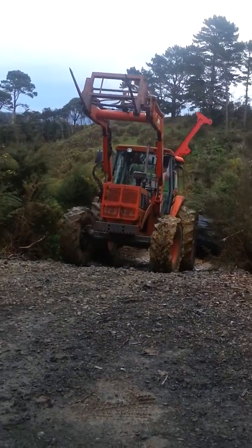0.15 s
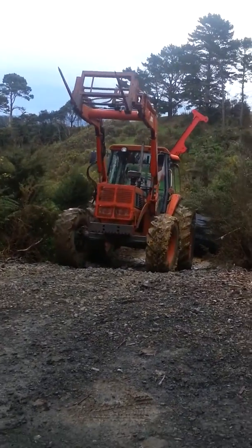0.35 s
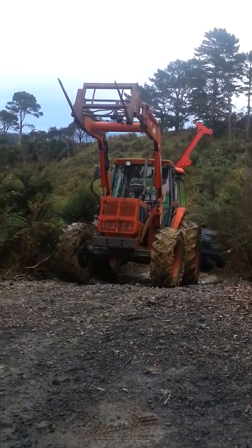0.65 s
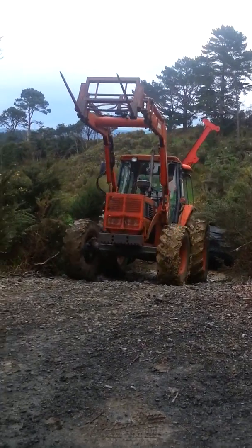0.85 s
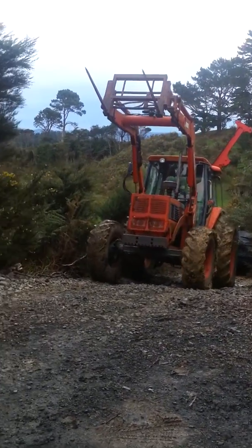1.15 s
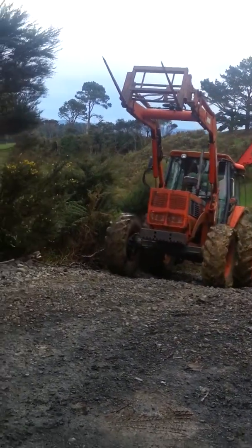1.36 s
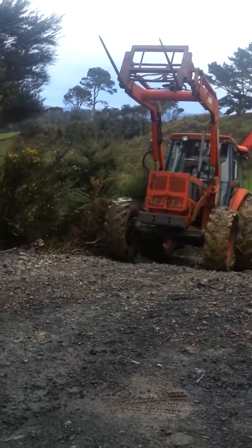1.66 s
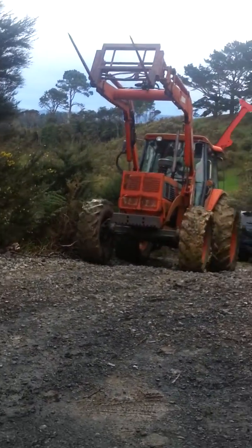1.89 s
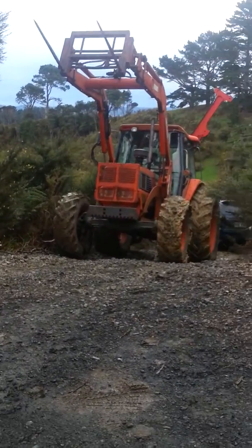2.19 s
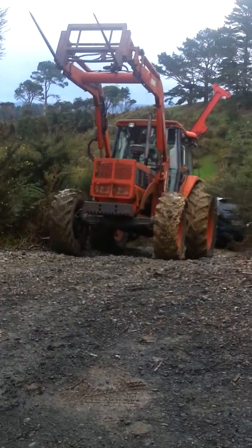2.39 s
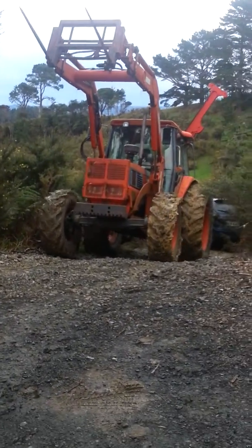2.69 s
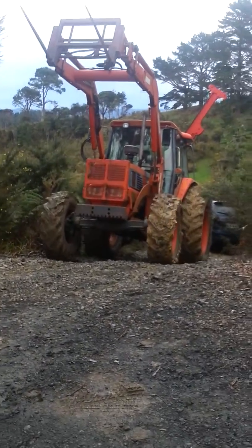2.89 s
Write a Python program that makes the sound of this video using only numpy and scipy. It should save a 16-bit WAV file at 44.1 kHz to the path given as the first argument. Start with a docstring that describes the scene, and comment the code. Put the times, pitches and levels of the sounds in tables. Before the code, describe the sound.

A diesel tractor engine runs continuously from 0 to 3 seconds, a throaty, hollow, low-mid throb of about fifty firings a second with a slightly lumpy repeating beat. Rough block, fan and valve clatter fills in above. Speed rises slightly around 0.3 and again at the end; loudness flutters, dipping near 1.8. A tiny sharp stone tick falls at 0.24. Open outdoor stereo, dry.

```python
"""The throbbing roar and clatter of a five-cylinder diesel tractor on a gravel track, heard in the open.
Each firing excites the exhaust pipe's resonances with a pulse; hum is a sum of sines locked to the crank.
Block, fan and injectors give band noise and ringing, modulated by the firings; moving air makes the level waver.
A stone ticks under a tyre early on. A spaced pair of ports hears the noise, later on the left in some bands."""
import sys
import numpy as np
from scipy import signal
from scipy.io import wavfile

SR = 44100
rng = np.random.default_rng(int(sys.argv[2]) if len(sys.argv) > 2 else 0)


def to_wav(s):
    """Save 16-bit WAV."""
    ch = np.atleast_2d(s).T  # columns
    pcm = np.round(np.clip(ch, -1, 1) * 32767)  # PCM
    wavfile.write(sys.argv[1], SR, pcm.astype(np.int16))


def invert_db(level):
    """Linear amplitude ratio for a level in decibels (20 dB per decade), elementwise."""
    return 10 ** (np.asarray(level, dtype=float) / 20)


N = 134064
RUN_IN = SR // 2  # samples computed before time zero, so that resonances are already ringing
LENGTH = N + RUN_IN

# Crank speed: [t/s, speed/rpm]
CRANK_SPEED = [(0.0, 1212.6), (0.25, 1262.4), (0.51, 1256.2), (0.76, 1222.4), (1.01, 1203.7),
               (1.27, 1201.0), (1.52, 1208.2), (1.77, 1213.1), (2.03, 1208.9), (2.28, 1228.3),
               (2.53, 1214.6), (2.79, 1211.5), (3.04, 1264.1)]
IDLE_RPM = 1213
START_CYCLE = -.011  # share of the two-turn cycle at time zero

# Pipe resonances: [f/Hz at idle, t60/s at idle, delay/ms, 1 if the pitch follows crank speed]
PIPE_RESONANCES = [(208, .18, 5.6, 1), (273, .3, .18, 0), (300, .09, 1.06, 0), (435, .13, 2.6, 0),
                   (551, .14, 1.9, 0)]
# Cylinders in firing order, one row each: [relative level/dB given to each pipe resonance in turn]
CYLINDER_STRENGTHS = [(-64, -75, -75, -28, -22.5), (-20, -20, -16.5, -18, -20.5),
                      (-23, -37, -14.5, -61, -32.5), (-16, -59, -20.5, -43, -31),
                      (-11, -25.5, -24.5, -34, -28)]
# Delay from each cylinder, in firing order: [delay/ms]
MANIFOLD_DELAYS = [18.3, 17.03, 17.06, 18.98, 18.44]
FIRING_SPREAD_DB, FIRING_JITTER_MS, PULSE_MS = 1.5, .04, 1.2
PIPE_RISE_CYCLES = 3.4  # full width of a resonance's onset, in cycles of its own pitch
LOW_CUT_HZ = 172.6

# Low orders as pure hum: [multiple of the cycle rate, rms level/dB, lateness/share of the cycle]
HUM_ORDERS = [(5, -57, .156), (10, -45.5, .073), (15, -29.5, .045), (16, -37, .054)]

# Level curves at the listener, before the offsets below: [t/s, exhaust level/dB, roar level/dB]
LEVEL_CURVES = [(0, -17.5, -25.5), (.1, -16.5, -26), (.39, -15, -24.5), (.54, -18, -27.5),
                (.68, -17.5, -26), (.8, -18, -26.5), (.93, -14.5, -24.5), (1.1, -20.5, -28.5),
                (1.23, -16.5, -25), (1.36, -18, -27.5), (1.54, -16, -23.5), (1.63, -19, -28),
                (1.83, -22, -29), (1.93, -18, -26.5), (2.05, -21.5, -27.5), (2.2, -18, -26.5),
                (2.3, -16.5, -23.5), (2.5, -20.5, -28), (2.59, -16, -24.5), (2.79, -19, -25.5),
                (2.93, -17.5, -24), (3.04, -17, -24)]
EXHAUST_OFFSET_DB, ROAR_OFFSET_DB, EXHAUST_WAVER_DB = 19.5, 2, .3

# Spectrum of the roar, before it is scaled as a whole: [f/Hz, relative level/dB]
ROAR_SPECTRUM = [(25, -75), (75, -51), (102, -46), (125, -21), (180, -37), (240, -14), (310, -16),
                 (372, -21), (480, -14.5), (650, -18), (1050, -22), (1500, -30), (2090, -20), (2400, -41),
                 (2660, -28), (4490, -39.5), (5640, -40.5), (10700, -57), (14800, -71)]
# Share due to the same contacts of valves, pistons and gears on every cycle: [f/Hz, power share/0-1]
REPEATED_SHARE = [(120, 0), (200, .75), (600, .75), (900, .5), (2200, .4), (5000, .25), (7000, 0)]
CONTACTS_PER_CYCLE = 120
# The roar around 3 kHz is stronger at first: [t/s, level/dB]
EARLY_BOOST = [(0, 2.5), (.35, 1), (.75, -1)]
EARLY_HZ, EARLY_OCTAVES = 3340, 0.26
TREBLE_FOLLOWS = 0.96  # share of the level swing left above 6 kHz

# Throb amplitude, negative for a dip at the peak angle: [f/Hz, per firing/dB, per cycle/dB]
THROB_DEPTH = [(300, -5, -1.5), (1100, -1.1, 2.55), (1930, -1.4, -0.28), (4350, 1.44, 0.9),
               (9000, 0.4, -0.5)]
FIRING_PEAK, CYCLE_PEAK = .17, .85  # reference angles of the throbs, share of the cycle

# Ringing of the block: [f/Hz, bandwidth/Hz, level/dB]
BLOCK_MODES = [(433.1, 21.8, -31.5), (553.4, 31, -43.5), (598.3, 14.3, -36), (870, 72, -37),
               (1173, 48, -38.5), (1362.5, 91, -39), (1678, 69, -41), (2140, 320, -37.5), (4457, 510, -43)]
BLOCK_FOLLOWS = 1  # share of the roar's level swing taken by the ringing

# Correlation of left and right before the lag: [f/Hz, correlation/0-1]
CHANNEL_LIKENESS = [(60, .99), (300, 0.8), (700, 0.99), (1400, 0.59), (3000, 0.72), (6500, 0), (14000, 0)]
# Level difference of the channels: [f/Hz, left minus right/dB]
CHANNEL_LEAN = [(60, -13), (200, 5.5), (680, -1), (1260, 1), (2310, 4.5), (4250, -4), (7820, -4.5),
                (14400, -20.5)]
# Delay of left behind right: [f/Hz, lag/samples]
LEFT_LAG = [(300, 0), (1000, 2), (1700, 0), (2600, 9), (15000, 9)]

# A stone ticks under a tyre: [t/s, click level/dB]
STONE_TICKS = [(.2353, -23)]
STONE_HZ, STONE_T60_S = 13300, .0009


def rms_one(x):
    """Normalisation: scale a signal to unit rms."""
    return x / np.sqrt(np.mean(x ** 2) + 1e-20)


def in_time(rows):
    """Linear interpolation: columns of a time curve, per sample, run-in included."""
    s, *columns = np.transpose(rows)
    time = (np.arange(LENGTH) - RUN_IN) / SR
    return [np.interp(time, s, c) for c in columns]


def at_hz(points, hz, column=1):
    """Spectral interpolation on a logarithmic frequency axis."""
    points = np.array(points)
    return np.interp(np.log(hz), np.log(points[:, 0]), points[:, column])


def drift(rate):
    """Low-passed noise: a slow random signal of unit rms, with its two poles at rate in Hz."""
    step = 40  # samples between computed points
    r = np.exp(-2 * np.pi * rate * step / SR)
    white = rng.standard_normal(LENGTH // step + 2002)
    slow = signal.lfilter([1], [1, -2 * r, r * r], white)[2000:]
    return np.interp(np.arange(LENGTH) / step, np.arange(len(slow)), rms_one(slow))


def ring(clicks, hz, t60):
    """Damped resonance: a unit click starts a sine of unit initial envelope."""
    r, w = invert_db(-60 / (t60 * SR)), 2 * np.pi * hz / SR
    return signal.lfilter([0, np.sin(w)], [1, -2 * r * np.cos(w), r * r], clicks + 1e-18)


def crank():
    """Phase is the integral of speed: two-turn engine cycles counted through time."""
    rpm, = in_time(CRANK_SPEED)
    cycle = np.cumsum(rpm) / (120 * SR)
    return cycle - cycle[RUN_IN] + START_CYCLE


def exhaust(cycle):
    """Impulse excitation: each firing strikes every pipe resonance with its cylinder's own strength."""
    firing = np.arange(np.ceil(5 * cycle[0]), 5 * cycle[-1]).astype(int)
    cylinder = firing % 5
    steady, out = np.arange(LENGTH), np.zeros(LENGTH)
    # Filtering on a clock that runs with the crank makes a resonance's pitch follow the speed.
    turning = (cycle - cycle[0]) * 120 / IDLE_RPM * SR
    for k, (hz, t60, delay_ms, follows) in enumerate(PIPE_RESONANCES):
        clock = turning if follows else steady
        chance = rng.standard_normal((len(firing), 2))
        ms = np.array(MANIFOLD_DELAYS)[cylinder] + delay_ms + FIRING_JITTER_MS * chance[:, 0]
        at = np.interp(firing / 5, cycle, clock) + ms * SR / 1000
        strength_db = np.array(CYLINDER_STRENGTHS)[cylinder, k] + FIRING_SPREAD_DB * chance[:, 1]
        clicks = np.zeros(LENGTH + SR)
        clicks[np.round(at).astype(int)] = invert_db(strength_db)
        # A windowed cosine at the resonance's pitch softens its onset.
        lag = np.arange(-400, 401) / SR
        rise = np.cos(np.pi * np.clip(lag * hz / PIPE_RISE_CYCLES, -.5, .5)) ** 2
        onset = 2 * rise * np.cos(2 * np.pi * hz * lag) / rise.sum()
        clicks = signal.fftconvolve(clicks, onset, "same")
        out += np.interp(clock, np.arange(LENGTH + SR), ring(clicks, hz, t60))
    puff = np.hanning(int(PULSE_MS * SR / 1000) + 3)
    out = np.convolve(out, puff / puff.sum(), "same")
    low_cut = signal.butter(4, LOW_CUT_HZ, "high", fs=SR, output="sos")
    return signal.sosfiltfilt(low_cut, out)


def hum(cycle):
    """Harmonic synthesis: sines at multiples of the cycle rate, wavering a little in level."""
    out = 0
    for order, db, late in HUM_ORDERS:
        height = np.sqrt(2) * invert_db(db + 1.3 * drift(14))
        out = out + height * np.sin(2 * np.pi * order * (cycle - late))
    return out


def throb(cycle, hz):
    """Amplitude modulation: gain of a noise band, periodic in the firing and in the cycle."""
    firing_db = at_hz(THROB_DEPTH, hz) * np.cos(10 * np.pi * (cycle - FIRING_PEAK))
    cycle_db = at_hz(THROB_DEPTH, hz, column=2) * np.cos(2 * np.pi * (cycle - CYCLE_PEAK))
    return invert_db(firing_db + cycle_db)


def pair(mid, side, hz):
    """Partial coherence: two noises make left and right with their band's likeness, lean and lag."""
    alike = np.clip(at_hz(CHANNEL_LIKENESS, hz), 0, 1)
    common, opposed = np.sqrt(1 + alike) * mid, np.sqrt(1 - alike) * side
    left, right = (common + opposed * [[1], [-1]]) / np.sqrt(2)
    lean = invert_db(at_hz(CHANNEL_LEAN, hz) / 2)
    lag = round(at_hz(LEFT_LAG, hz))
    return np.array([lean * np.roll(left, lag), right / lean])


def excite(cycle):
    """Random and cyclic excitation: fresh noise, and contacts at fixed crank angles; each as mid and side."""
    angle = rng.random(CONTACTS_PER_CYCLE)
    size = rng.standard_normal((2, CONTACTS_PER_CYCLE))
    turns = np.arange(np.floor(cycle[0]), cycle[-1])[:, None]
    at = np.interp(turns + angle, cycle, np.arange(LENGTH)).astype(int).ravel()
    inside = (at > 0) * (at < LENGTH - 1)
    contacts = [np.bincount(at, np.tile(s, len(turns)) * inside, LENGTH) for s in size]
    fresh = rng.standard_normal((2, LENGTH))
    return np.array([fresh, rms_one(np.array(contacts))])


def blend(fresh, looped, hz):
    """Power-preserving sum: mix the two excitations by the band's share of repeats."""
    share = at_hz(REPEATED_SHARE, hz)
    return np.sqrt(1 - share) * fresh + np.sqrt(share) * looped


def roar(cycle, level_db, waver_db):
    """Band-filtered noise: third octaves of block and fan noise, flickering together and apart."""
    out, edges = 0, 32 * 2 ** (np.arange(28) / 3)
    sources = [excite(cycle), excite(cycle)]  # neighbouring bands take turns
    together, (early_db,) = drift(48.0), in_time(EARLY_BOOST)
    swing_db = level_db - level_db.mean()
    for k, (low, high) in enumerate(zip(edges, edges[1:])):
        hz = np.sqrt(low * high)
        band = signal.butter(2, [low, high], "band", fs=SR, output="sos")
        mid, side = signal.sosfilt(band, blend(*sources[k % 2], hz))
        db = at_hz(ROAR_SPECTRUM, hz) + waver_db * together + 1.3 * drift(11.6)
        db = db + early_db * np.exp(-(np.log2(hz / EARLY_HZ) / EARLY_OCTAVES) ** 2)
        db = db - (hz > 6000) * (1 - TREBLE_FOLLOWS) * swing_db
        out = out + invert_db(db) * throb(cycle, hz) * pair(mid, side, hz)
    return invert_db(level_db) * rms_one(out)


def block(cycle):
    """Modal resonance: noise rings in the panels and the block, throbbing with the firings."""
    out, source = 0, excite(cycle)
    for hz, width_hz, db in BLOCK_MODES:
        r = np.exp(-np.pi * width_hz / SR)
        poles = [1, -2 * r * np.cos(2 * np.pi * hz / SR), r * r]
        noise = blend(*source, hz)
        for _ in range(2):
            noise = signal.lfilter([1, 0, -1], poles, noise)
        out = out + invert_db(db + 1.7 * drift(6.3)) * throb(cycle, hz) * pair(*rms_one(noise), hz)
    return out


def stone():
    """Impulse response: a click rings one short, bright, heavily damped resonance."""
    clicks = np.zeros(LENGTH)
    for s, db in STONE_TICKS:
        clicks[RUN_IN + int(s * SR)] = invert_db(db)
    return ring(clicks, STONE_HZ, STONE_T60_S)


def scene():
    """Superposition: the engine layers under their level curves, plus the stone, without the run-in."""
    cycle, (exhaust_db, roar_db) = crank(), in_time(LEVEL_CURVES)
    exhaust_gain = invert_db(exhaust_db + EXHAUST_OFFSET_DB + EXHAUST_WAVER_DB * drift(9.0))
    pulses = exhaust_gain * exhaust(cycle)
    block_gain = invert_db(BLOCK_FOLLOWS * (roar_db - roar_db.mean()))
    noise = roar(cycle, roar_db + ROAR_OFFSET_DB, waver_db=0.55) + block_gain * block(cycle)
    balance = invert_db(np.array([[.55], [-.55]]))  # left and right, dB
    tonal = (pulses + hum(cycle)) * balance
    return (tonal + noise + stone())[:, RUN_IN:]


def top_cut(x):
    """Nothing passes above the cut-off."""
    return signal.sosfilt(signal.butter(12, 14970, fs=SR, output="sos"), x)


def record(dry):
    """Storage: the finished mix is kept at the level it has."""
    return top_cut(dry)


dry = scene()
out = record(dry)
to_wav(out)
```